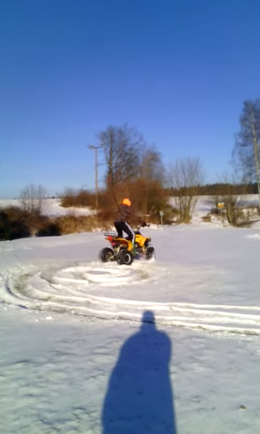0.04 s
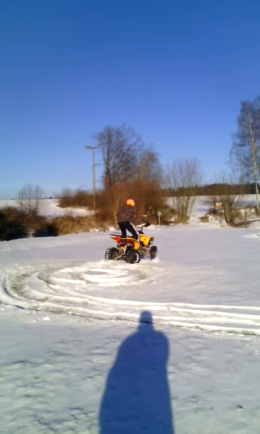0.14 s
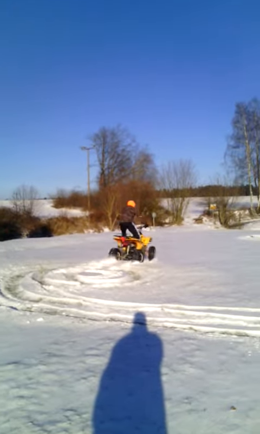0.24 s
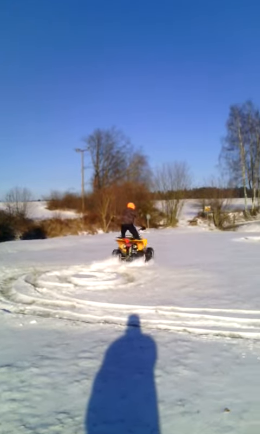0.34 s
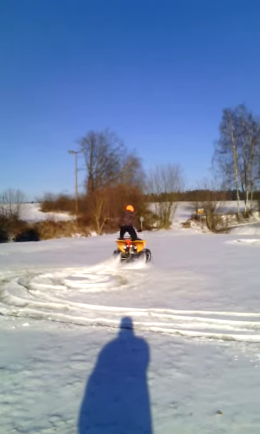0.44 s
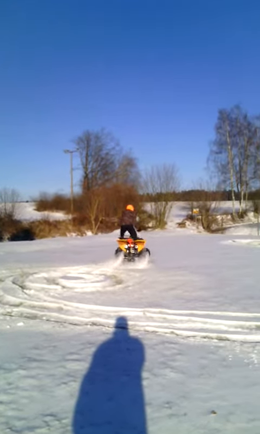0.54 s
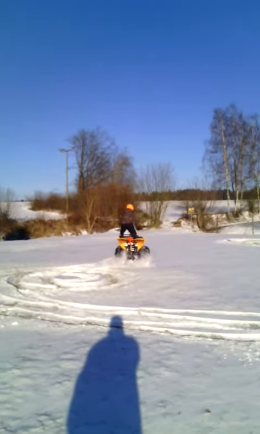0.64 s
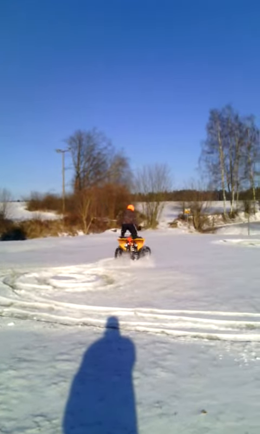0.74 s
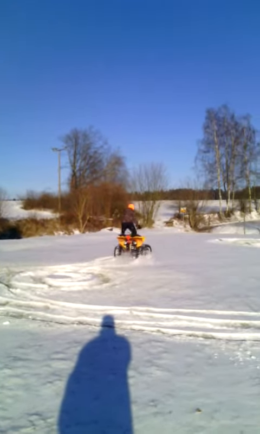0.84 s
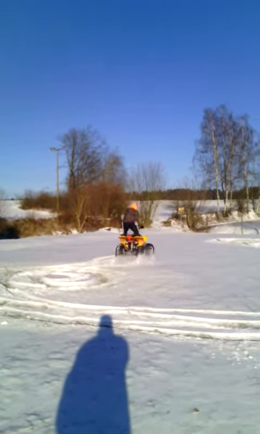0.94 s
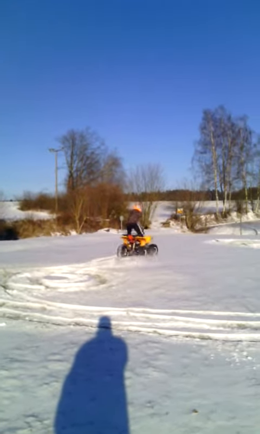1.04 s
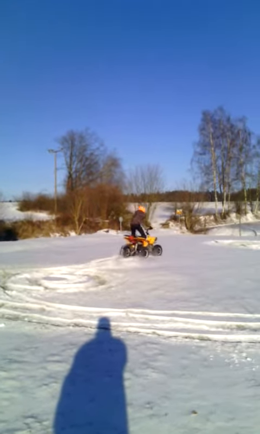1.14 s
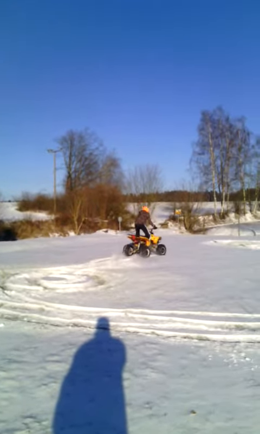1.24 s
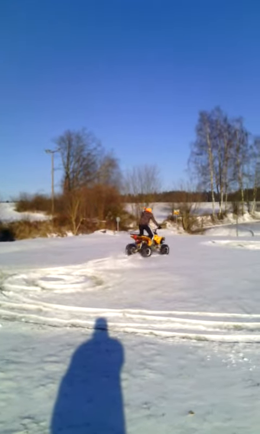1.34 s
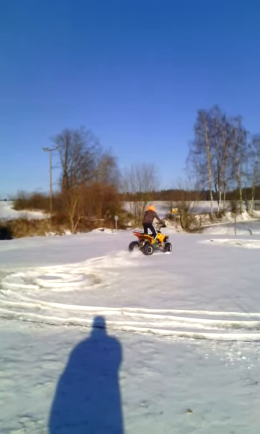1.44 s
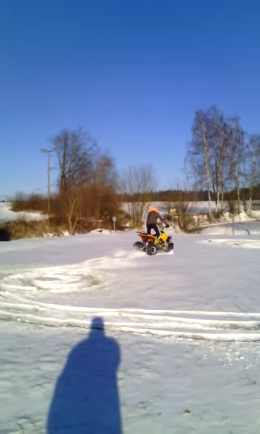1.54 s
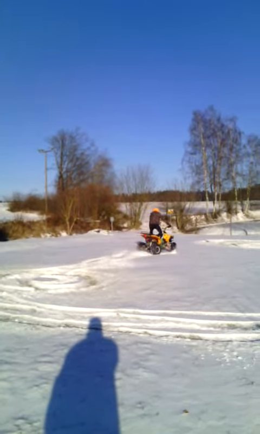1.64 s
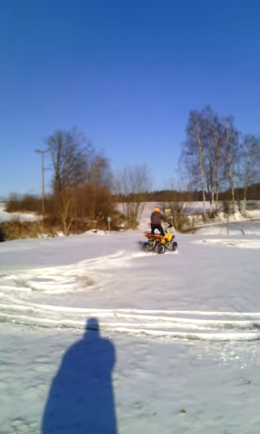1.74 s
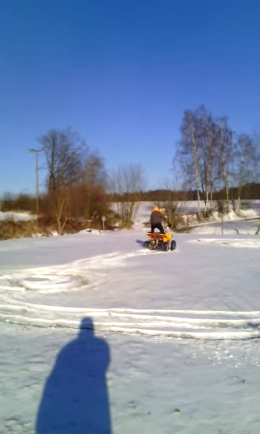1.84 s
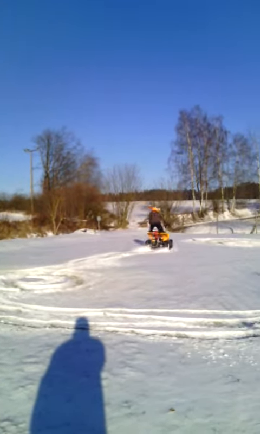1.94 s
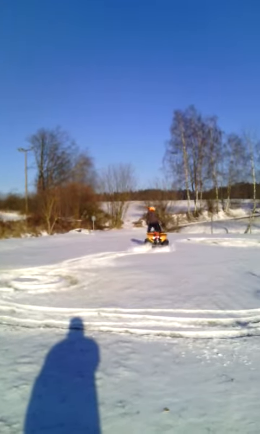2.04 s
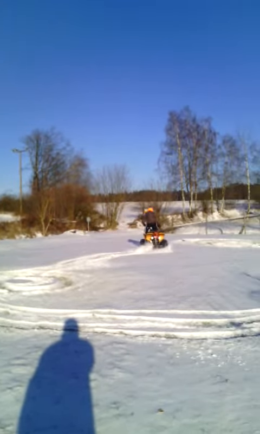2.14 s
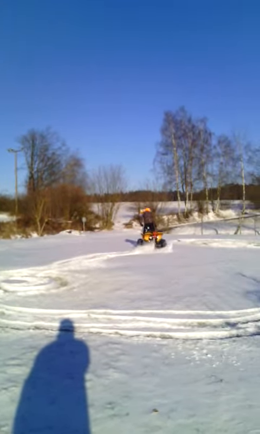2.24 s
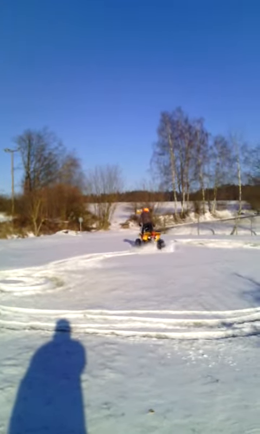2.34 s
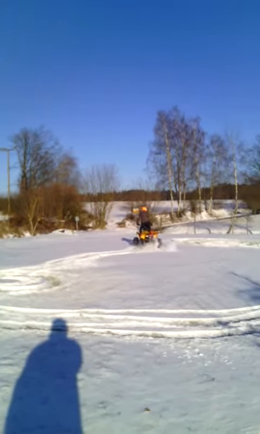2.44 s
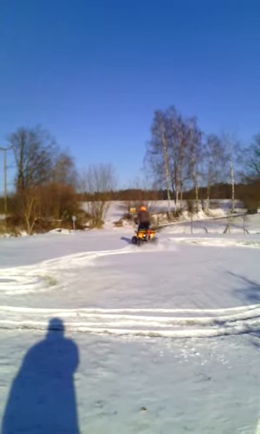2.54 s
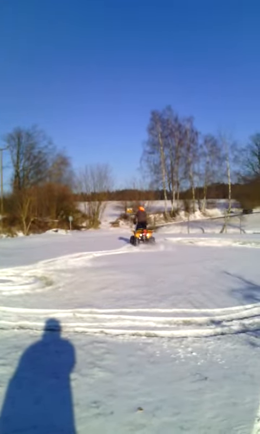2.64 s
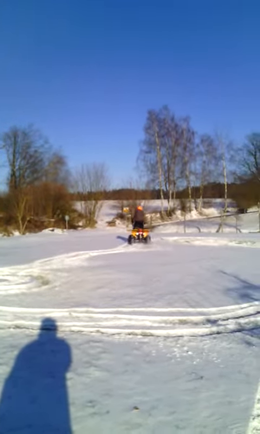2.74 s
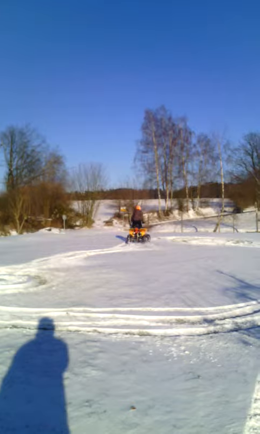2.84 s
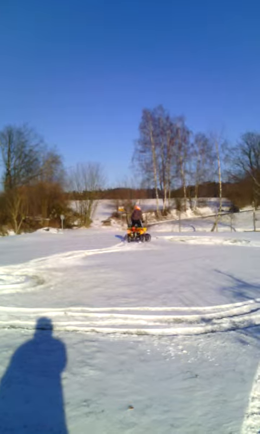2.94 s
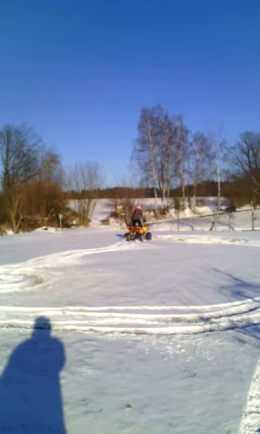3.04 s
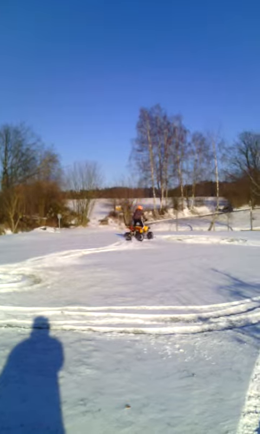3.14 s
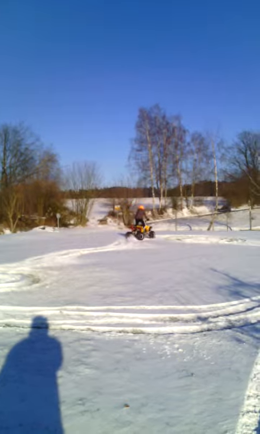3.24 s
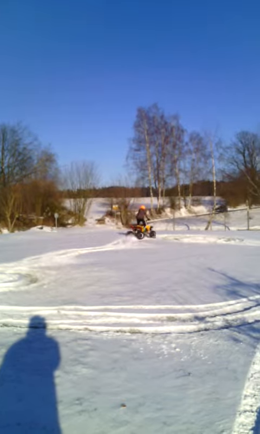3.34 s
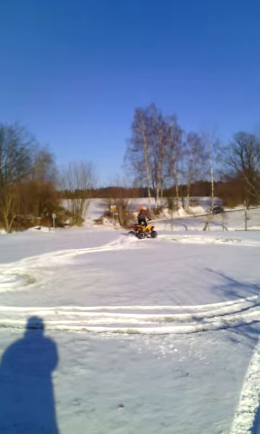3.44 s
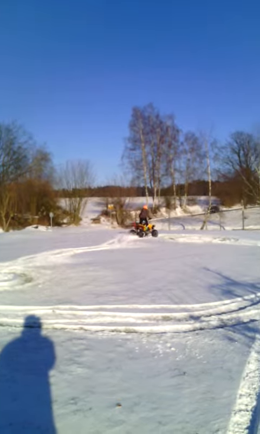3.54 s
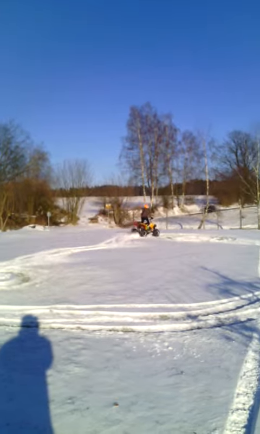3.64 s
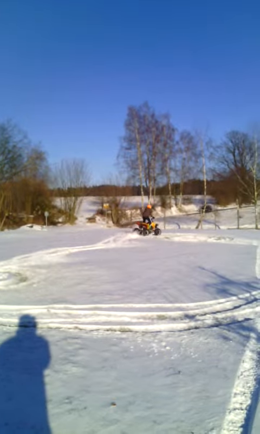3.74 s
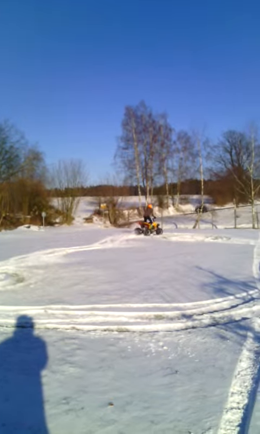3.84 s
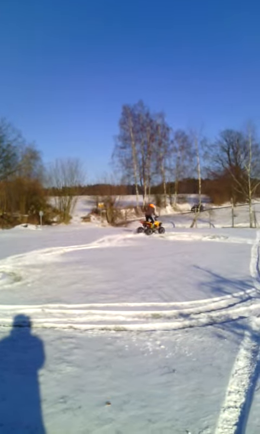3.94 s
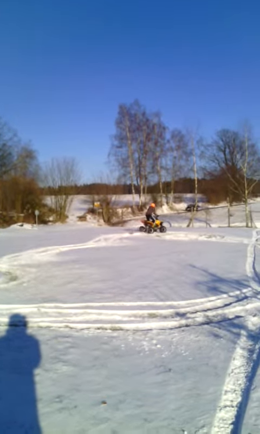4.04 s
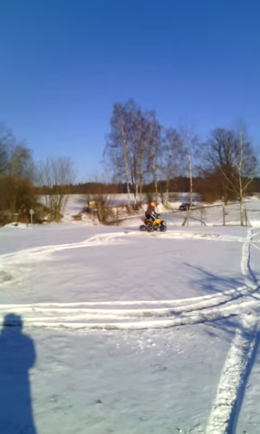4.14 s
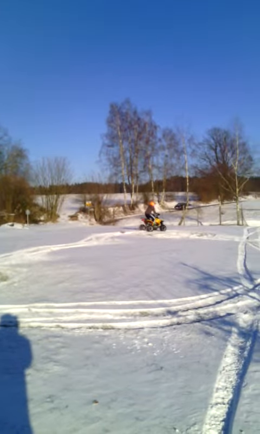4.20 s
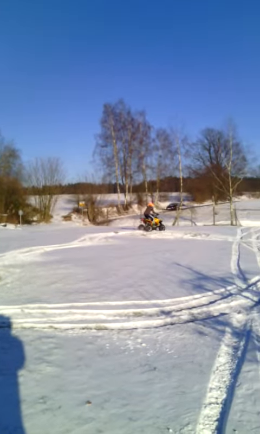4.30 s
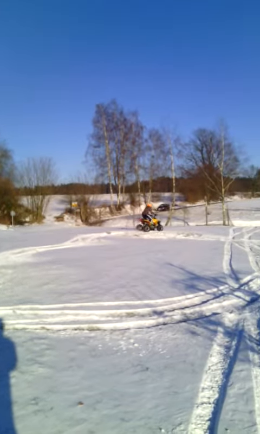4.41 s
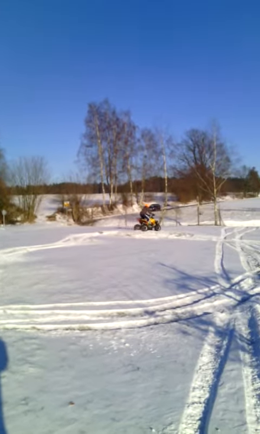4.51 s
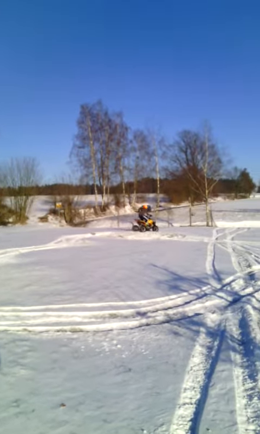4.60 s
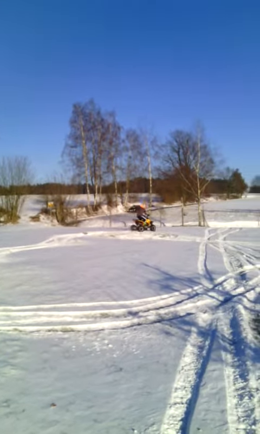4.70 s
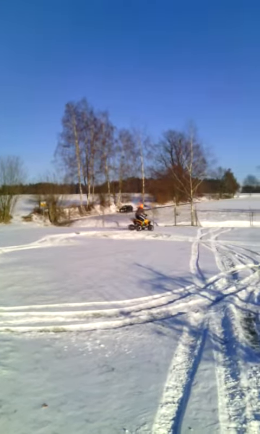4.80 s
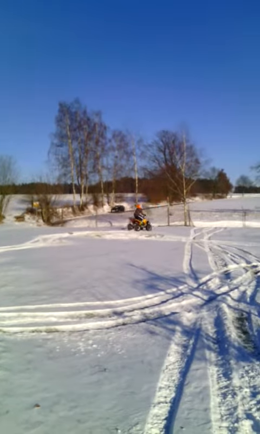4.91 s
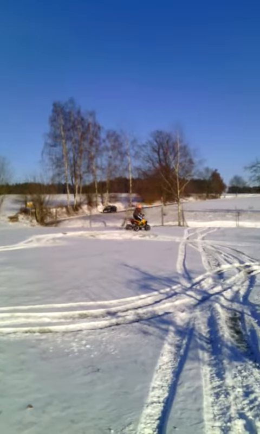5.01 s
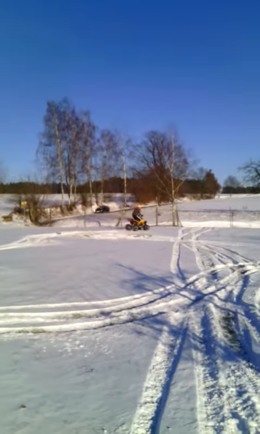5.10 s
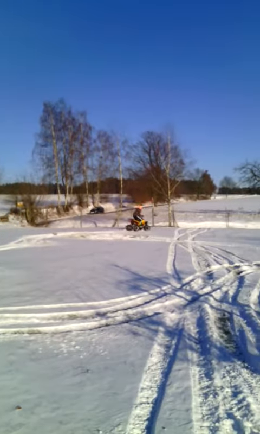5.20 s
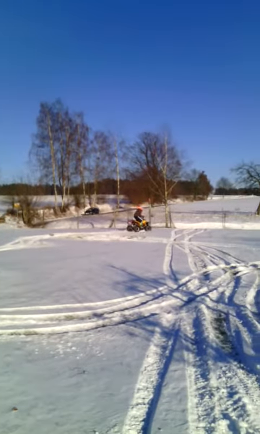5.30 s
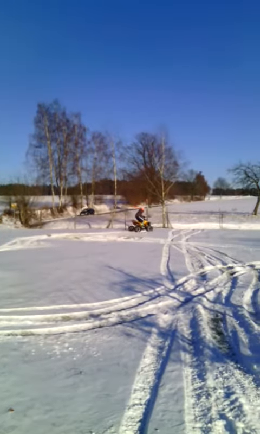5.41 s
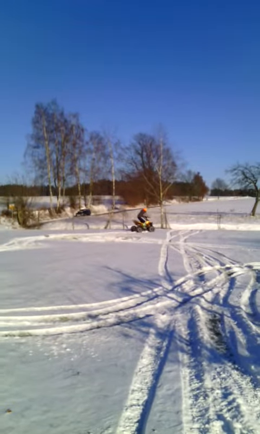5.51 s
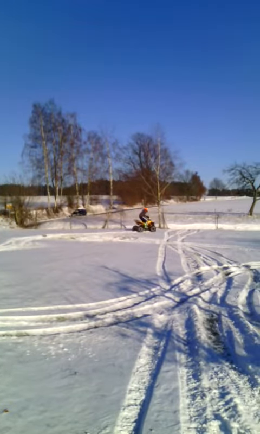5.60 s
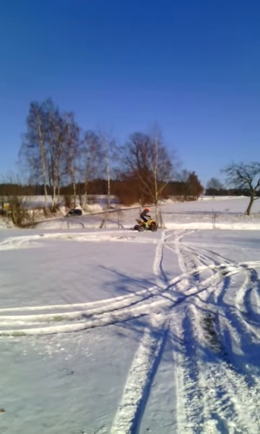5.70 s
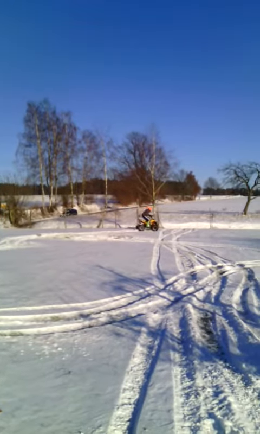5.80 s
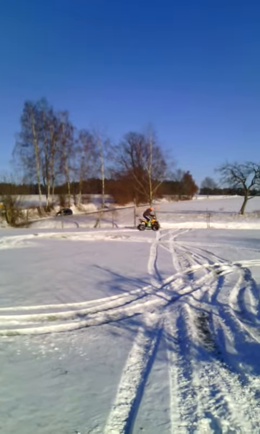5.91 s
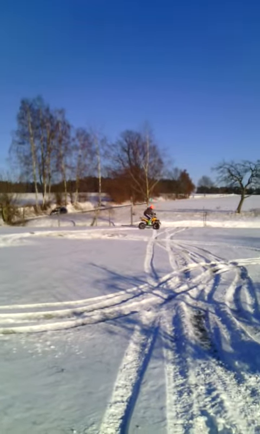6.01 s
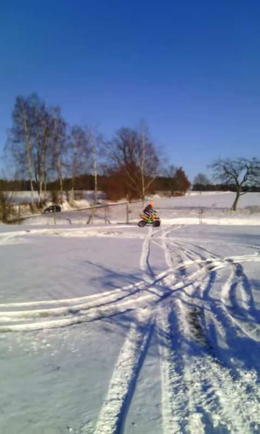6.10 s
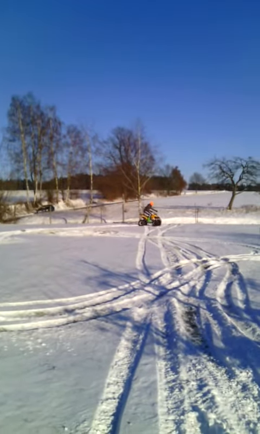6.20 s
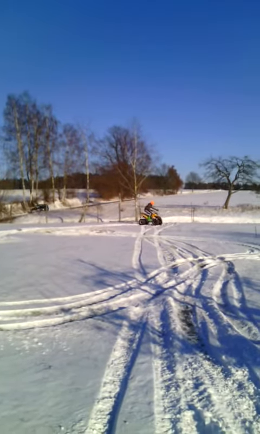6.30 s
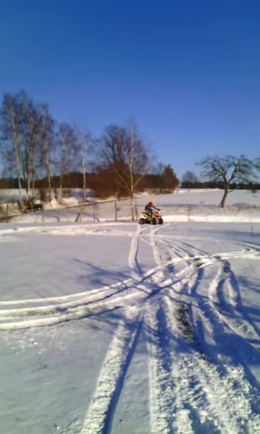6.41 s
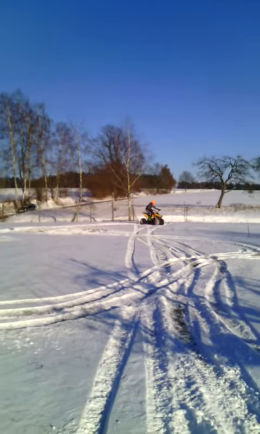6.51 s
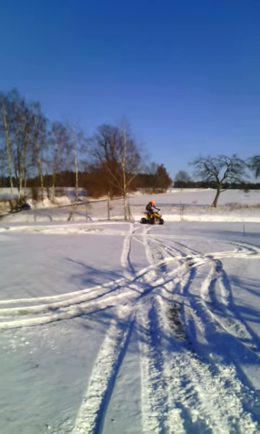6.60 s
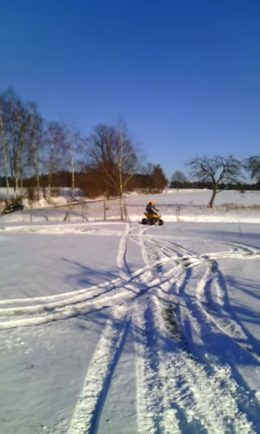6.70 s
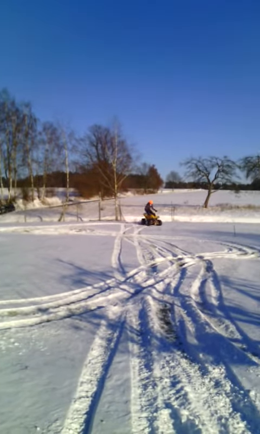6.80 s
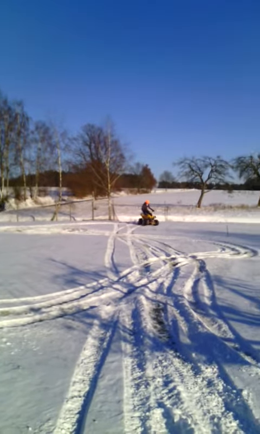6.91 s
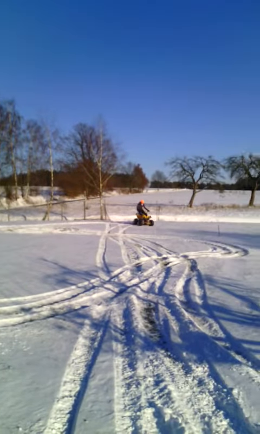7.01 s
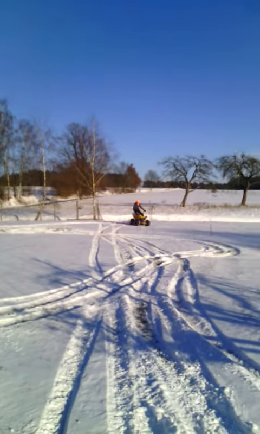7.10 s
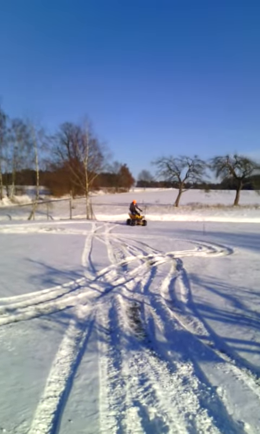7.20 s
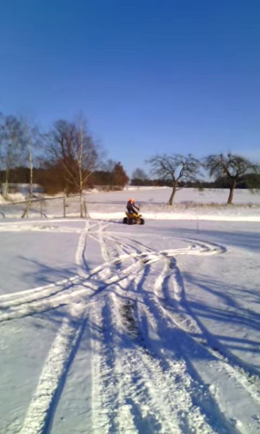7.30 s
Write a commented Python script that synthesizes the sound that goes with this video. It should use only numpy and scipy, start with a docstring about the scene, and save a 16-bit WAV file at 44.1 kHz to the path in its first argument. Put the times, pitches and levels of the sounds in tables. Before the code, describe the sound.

Raspy four-stroke quad engine pulls hard into the distance, tyres churning snow, shuts down to separate thuds, then revs moderately again.

```python
"""Quad bike leaving over snow

From an open snowy field: a single-cylinder four-stroke quad bike pulls away, drops to a putter and picks up.
Each firing booms in the silencer, cracks in the pipe and lets out a puff of gas that rasps and hisses.
The exhaust is built from pulses, harmonics and noise locked to the engine cycle; distance and aim set its level.
Wheels churn and squeak in the snow, the frame rattles, and small ticks sound close to the microphone."""
import sys
import numpy as np
from scipy import signal
from scipy.io import wavfile
from scipy.ndimage import uniform_filter1d

SR = 44100
rng = np.random.default_rng(int(sys.argv[2]) if len(sys.argv) > 2 else 0)


def store_pcm(level_fs):
    """Save levels as 16-bit WAV."""
    pcm = np.round(np.clip(level_fs, -1, 1) * 32767).astype(np.int16)
    wavfile.write(sys.argv[1], SR, np.atleast_2d(pcm).T)


N = 324135
TIME = np.arange(N) / SR
TAPS = 8192  # filter design length, samples
HZ = np.fft.rfftfreq(TAPS, 1 / SR)

# Still air over the field: pitch_hz, level_db (relative, per Hz)
AIR_COLOUR = [(20, -10), (50, -17), (120, -20), (250, -15), (400, -14), (700, -9), (1400, -8), (1680, -14),
              (1950, -6), (3000, -11), (4500, -15), (9000, -15), (15500, -18)]
AIR_DB = -58

# Wheels in the snow: start_s, level_db (RMS)
CHURN_LEVEL = [(0, -41), (3, -48.5), (4.5, -53.5), (5.4, -60), (6.4, -59), (6.8, -52.5), (7.15, -53.5),
               (7.35, -51)]
# Colour of the breaking snow: pitch_hz, level_db (relative, per Hz)
SNOW_COLOUR = [(60, -8), (350, -6), (700, 4.5), (1200, 2), (1720, 1), (2300, -7.5), (4000, -7.5),
               (5000, -21.5), (15000, -35)]
# Snow squeaking under the tyres: start_s, length_s, start_hz, end_hz, width_hz, level_db (RMS before the fades)
SQUEAKS = [(5.231, 0.029, 2320, 2580, 100, -41.5), (5.673, 0.11, 2880, 2900, 400, -54),
           (5.79, 0.081, 2770, 3000, 300, -52.5), (7.185, 0.11, 1600, 1690, 500, -45),
           (7.264, .13, 1644, 1884, 300, -43), (7.19, 0.19, 3720, 3880, 1000, -56.5)]
# Frame rattles: start_s, level_db (at the strike, relative)
RATTLES = [(1.975, -7), (2.862, -10), (3.8357, -7.5), (4.675, -30), (4.77, -32), (5.081, -20), (5.089, -20),
           (5.286, -22), (5.923, -21)]
# Ticks by the microphone: start_s, level_db, pitch_hz, decay_per_s
TICKS = [(1.2660, -10, 11500, 6000), (6.954, -30, 9000, 5000), (6.978, -26.5, 7450, 1500)]
# Heavy thumps as the throttle shuts: centre_s, level_db (peak), pitch_hz
STUMBLES = [(4.626, -39, 150), (4.653, -34, 154), (4.682, -39.5, 145), (4.741, -39, 146)]

# Engine speed: start_s, firings_per_s
FIRING_RATE = [(0.0, 36.59), (0.62, 41.95), (1.1, 44.94), (1.51, 43.62), (2.36, 45.18), (2.89, 42.14),
               (3.71, 43.58), (3.95, 44.83), (4.2, 41.81), (4.35, 42.96), (4.55, 39.39), (4.72, 31.2),
               (5.01, 28.06), (5.19, 28.29), (5.45, 21.12), (5.69, 24.56), (6.02, 27.07), (6.17, 30.09),
               (7.11, 36.66), (7.35, 36.33)]
# The rider holds the throttle wide, shuts it, then opens it about halfway: start_s, throttle (0-1)
THROTTLE = [(0, 0.72), (.45, 1), (1, 0.96), (4.52, 0.94), (4.59, 0.49), (4.73, 0.45), (4.85, .12),
            (5.55, 0.03), (5.93, 0.47), (7.35, 0.4)]
# Where the bike is, swinging as it goes: start_s, distance_m, tail facing the microphone (0-1)
PATH = [(0, 7.7, 0.15), (.28, 10.5, 0.4), (.58, 10.6, 1), (1.2, 14.1, 0.33), (1.85, 14.4, 0.03),
        (2.3, 18.5, 0.64), (2.88, 18.4, 0.83), (3.15, 22, 0.16), (3.7, 24.2, 0), (4.5, 31.2, 0.14),
        (5.5, 35, 0.4), (7.35, 24.5, 0.08)]
NEAR_M = 10  # reference distance of the exhaust levels, m

# Gas flow through one engine cycle: share of the cycle (0-1), level_db (before the depth of each puff scales it)
GAS_FLOW = [(0, -36), (.06, -1), (.115, 7.5), (.18, 3.5), (.29, -3), (.42, -5), (.66, -1.5), (.82, -8.5),
            (1, -3.5)]
FULL_FORCE = 0.88  # force of the gas pulse at full throttle (0-1)
LOAD_FROM, LOAD_SPAN = 0.674, 0.402  # throttle where the engine starts to pull; further share to full pull

# Levels of the exhaust parts, one row each: level_db (at NEAR_M, full throttle, side-on),
# loss_db with the throttle shut, loss_db per doubling of distance, gain_db tail-on
THRUM_LEVEL = (-42, -9, 4.5, -0.5)
BOOM_LEVEL = (-39, 1, 6.5, 4)
BARK_LEVEL = (-34, 14.5, 7.5, 0)
RASP_LEVEL = (-32, 19, 3.5, 2)
HISS_LEVEL = (-41, 12, 6.5, -1)
# Shares within the rasp, relative, same columns: rap of the valve opening, ring of the returning waves
RAP_LEVEL = (2, 21, 0.7, -3)
RING_LEVEL = (-13.5, 15, .2, 13.5)
# Knock when pulling at low revs: below_firings_per_s, rap_db per firing/s less (at full throttle)
LUG = (35.1, 2.1)

# Silencer note, relative levels: multiple of the firing rate, load_db, coast_db (before the muffling)
ORDERS = [(1, -50, -38), (2, -45, -4.5), (3, -9, -4), (4, -7, 0), (5, 6.5, 4), (6, -8.5, 8), (7, -44, 3),
          (8, -23, 2.5), (9, -16.5, 2), (10, -23, 3.5), (11, -11.5, -4), (12, -15, -0.5)]
# The silencer swallows the top of the soft coasting pulses: pitch_hz, gain_db
MUFFLE = [(20, -35), (60, -3.5), (120, -0.5), (190, 5.5), (220, -4.5), (245, -18), (290, -16), (335, -11.5),
          (400, -31)]
# Resonance of the silencer box: pitch_hz, width_hz (centre to half gain_db), gain_db (at full load)
BOX = (193, 16, 3.7)
MAIN_ORDER = 5  # multiple of the firing rate that excites the box
# Gas rumbling through the silencer: pitch_hz, level_db (relative, per Hz)
RUMBLE_COLOUR = [(25, -32), (55, -19), (85, -9), (130, -7), (190, 8.5), (240, -1.5), (330, -12), (500, -27),
                 (1500, -60)]

# Exhaust resonances, relative levels; the spread is narrowed a little in resonances().
# Low ones of the pipe: pitch_hz, spread_hz, level_db
PIPE_MODES = [(500, 42, -2), (654, 54, 3), (815, 55, -0.5), (1062, 91, -3), (1266, 107, 0), (1453, 152, 1),
              (950, 900, -18)]
# Those of the tailpipe: pitch_hz, spread_hz, level_db
TAILPIPE_MODES = [(1870, 65, 2.5), (1974, 87, 0.5), (2496, 92, -11), (2494, 340, -5.5), (2760, 490, -17),
                  (3237, 210, -11), (3844, 60, -14.5), (3990, 40, -12)]
# Those of the outlet: pitch_hz, spread_hz, level_db
OUTLET_MODES = [(4300, 530, -4.5), (5015, 115, -2), (5630, 370, 1), (6260, 270, 0.5), (7000, 220, -1),
                (7610, 215, 3), (8420, 220, 2), (9140, 240, 2.5), (9880, 290, 0.5), (10550, 350, -0.5),
                (11380, 310, -1.5), (12020, 560, -2.5), (11700, 340, -7.5), (12700, 440, 2),
                (14050, 350, -0.5), (14900, 1600, -9.5)]
TURBULENCE_DB = -3.5  # turbulence in the pipe beside the crack
# The hiss is duller tail-on than side-on: pivot_hz, loss_db per octave tail-on, facing where it is level (0-1)
BEAM = (6900, 4.5, 0.38)

EDGE_HZ = 15750  # upper limit of the recorder


def amp(db):
    """Decibels to gain."""
    return 10 ** (np.asarray(db) / 20)


def curve(rows):
    """The columns of a time table, one value per sample."""
    s, *columns = np.transpose(rows)
    return [np.interp(TIME, s, column) for column in columns]


def spectrum(points):
    """Gain over frequency from a few points, joined on a log-frequency scale."""
    hz, db = np.transpose(points)
    return amp(np.interp(np.log(HZ + 1), np.log(hz), db))


def resonances(modes):
    """Gain over frequency of steep-sided resonances, summed in power."""
    power = 0
    for hz, spread_hz, db in modes:
        detuning = (HZ - hz) / (0.95 * spread_hz)
        power = power + amp(db) ** 2 / (1 + detuning ** 2) ** 2
    return np.sqrt(power)


def ring(x, gain):
    """Passes x through a causal minimum-phase filter, so that every pulse rings after its blow."""
    log_gain = np.log(np.maximum(gain, 1e-5))
    both_sides = np.r_[log_gain, log_gain[-2:0:-1]]
    minimum_phase = np.exp(np.conj(signal.hilbert(both_sides)))
    response = np.fft.ifft(minimum_phase).real
    return signal.oaconvolve(x, response[:TAPS // 2])[:N]


def steady(x, size=6000):
    """Holds the power near 1 over several cycles (size in samples), leaving the pulses intact."""
    power = uniform_filter1d(uniform_filter1d(x ** 2, size), size)
    return x / np.sqrt(abs(power) + 1e-20)


def noise():
    """White noise."""
    return rng.standard_normal(N)


def drift(per_s):
    """Slow random wander between points of unit spread, one value per sample."""
    knots = np.arange(0, TIME[-1] + 1, 1 / per_s)
    return np.interp(TIME, knots, rng.standard_normal(len(knots)))


def add(mix, s, sound):
    """Lays a sound into the mix at time s."""
    part = mix[max(round(s * SR), 0):][:len(sound)]
    part += sound[:len(part)]


def air():
    """Faint even background of the open field: coloured noise."""
    return amp(AIR_DB) * steady(ring(noise(), spectrum(AIR_COLOUR)))


def wheels():
    """Tyres break the snow crust in many small grains, and squeak where they slip."""
    grains = noise() * amp(2.2 * noise())
    out = amp(curve(CHURN_LEVEL)[0]) * steady(ring(grains, spectrum(SNOW_COLOUR)))
    for s, length, start_hz, end_hz, width_hz, db in SQUEAKS:
        hz = np.linspace(start_hz, end_hz, int(length * SR))
        # narrow noise around zero pitch, then shifted up to the gliding squeak
        low_pass = signal.butter(2, width_hz / SR)
        slip = signal.lfilter(*low_pass, noise() + 1j * noise())[-len(hz):]
        glide = np.exp(2j * np.pi * np.cumsum(hz) / SR)
        squeak = (slip * glide).real
        fade = signal.windows.tukey(len(hz), 0.7)
        add(out, s, amp(db) * fade * squeak / squeak.std())
    return out


def frame(rattle_db=-5, t60=0.039):
    """Bumps shake loose metal: short noise bursts ring through the tailpipe resonances."""
    t = np.arange(SR // 20) / SR
    out = np.zeros(N)
    for s, db in RATTLES:
        decay = amp(db + rattle_db - 60 * t / t60)
        add(out, s, decay * rng.standard_normal(len(t)))
    return ring(out, resonances(TAILPIPE_MODES))


def ticks(tail_db=-24, t60=0.011):
    """Tiny hard ticks next to the microphone: a fast-dying tone, each with a short fizz."""
    t = np.arange(SR // 50) / SR
    out = np.zeros(N)
    for s, db, hz, decay_per_s in TICKS:
        tick = np.cos(2 * np.pi * hz * t) * np.exp(-decay_per_s * t)
        fizz = np.diff(rng.standard_normal(len(t) + 1)) * amp(tail_db - 60 * t / t60)
        add(out, s, amp(db) * (tick + fizz))
    return out


def stumbles(length=0.007):
    """Unburnt fuel burns in a few heavy, dull thumps: low tones under a bell-shaped swell (length in s)."""
    out = 0
    for s, db, hz in STUMBLES:
        swell = np.exp(-((TIME - s) / length) ** 2)
        out = out - amp(db) * swell * np.cos(2 * np.pi * hz * (TIME - s))
    return out


def pulses(turns, lag, jitter, uneven_db):
    """One click per engine cycle, lag of a cycle late, uneven in time (jitter in s) and strength."""
    cycle = np.arange(int(turns[-1]) + 1)
    late, strength = rng.standard_normal((len(cycle), 2)).T
    at = ((np.interp(cycle + lag, turns, TIME) + jitter * late) * SR).astype(int)
    inside = (at > 0) & (at < N) & (cycle + lag < turns[-1])
    out = np.zeros(N)
    out[at[inside]] = amp(uneven_db * strength[inside])
    return out


def puffs(turns, depth, uneven_db):
    """Turbulence that follows the gas flow; no two firings are equally strong."""
    flow_db = np.interp(turns % 1, *np.transpose(GAS_FLOW))
    strength = rng.standard_normal(size=1000)[turns.astype(int)]
    # the unevenness shows most where the flow is strong
    return noise() * amp(depth * flow_db + uneven_db * strength * amp(flow_db))


def level_db(part):
    """A part's level follows the throttle, the distance and the way the exhaust points."""
    near_db, shut_db, doubling_db, tail_db = part
    throttle, = curve(THROTTLE)
    distance, facing = curve(PATH)
    distance_db = doubling_db * np.log2(distance / NEAR_M)
    return near_db - shut_db * (1 - throttle) - distance_db + tail_db * facing


def outlet(turns, force):
    """Each puff hisses through the outlet resonances; the colour shifts as the outlet swings about."""
    pivot_hz, tilt_db, level_facing = BEAM
    facing = curve(PATH)[1]
    out = 0
    for modes in np.array_split(OUTLET_MODES, len(OUTLET_MODES) // 3):
        octaves = np.log2(modes[:, 0].mean() / pivot_hz)
        beam_db = -tilt_db * (facing - level_facing) * octaves
        gas = puffs(turns + 0.02, depth=0.55 + 0.5 * force, uneven_db=1.5)
        gas = gas * amp(1.2 * drift(per_s=3))
        out += ring(gas * amp(beam_db), resonances(modes))
    return steady(out)


def tailpipe(turns, force, rap_db, ring_db):
    """The valve opens with a rap, gas rushes out, and returning waves ring the pipe twice more."""
    snap = pulses(turns, lag=0.082, jitter=0.00015, uneven_db=2)
    rush = steady(puffs(turns + 0.02, depth=0.45 + 0.15 * force, uneven_db=1))
    returns = sum(pulses(turns, lag=lag, jitter=0.00028, uneven_db=2) for lag in (0.38, 0.68))
    rap_modes = [(2025, 91, 4), (2337, 237, -2.5), (3250, 430, -41)]
    rap = steady(ring(snap, resonances(rap_modes)))
    # bright at light throttle
    clink = amp(-4.5) * (1 - force) ** 2 * steady(ring(snap, resonances([(3810, 86, 0)])))
    after = steady(ring(returns, resonances([(1964, 160, 0)])))
    gas = steady(ring(rush, resonances(TAILPIPE_MODES)))
    return steady(gas + amp(rap_db) * (rap + clink) + amp(ring_db) * after)


def pipe(turns, force):
    """The pressure wave steepens into a double crack, much alike from firing to firing, with turbulence."""
    first, second = (pulses(turns, lag=lag, jitter=0.00004, uneven_db=1.3) for lag in (0.18, 0.355))
    crack = -force * steady(0.55 * first + second)
    turbulence = amp(TURBULENCE_DB) * steady(puffs(turns, depth=0.044, uneven_db=1.7))
    coarse = spectrum([(450, -11.5), (850, -6.5), (1200, 3), (1600, 4)])
    modes = resonances(PIPE_MODES)
    return steady(ring(crack, modes) + ring(turbulence, modes * coarse))


def silencer(turns, load, waver_db=1.7, uneven_db=0.78, rumble_db=-19):
    """Separate thuds when coasting merge into a wavering drone under load, over a rumble of gas."""
    rate, = curve(FIRING_RATE)
    phase = 2 * np.pi * (turns - 0.25 - 0.04 * load)
    note = 0
    for k, load_db, coast_db in ORDERS:
        muffle_db = np.interp(k * rate, *np.transpose(MUFFLE))
        strength = load * amp(load_db) + (1 - load) * amp(coast_db + muffle_db)
        note -= strength * amp(waver_db * drift(per_s=14)) * np.cos(k * phase)
    # the box booms when the main order passes through its pitch
    box_hz, width_hz, box_db = BOX
    detuning = (MAIN_ORDER * rate - box_hz) / width_hz
    resonance = amp(box_db * load / (1 + detuning ** 2))
    rumble = amp(rumble_db) * steady(ring(noise(), spectrum(RUMBLE_COLOUR)))
    return resonance * steady(note) * amp(uneven_db * drift(per_s=30)) + rumble


def crank(turns, load):
    """A low wavering hum under load, one swing per turn of the crank, two per engine cycle."""
    hum = np.sqrt(2) * np.sin(2 * np.pi * 2 * turns)
    return load * amp(0.71 * drift(per_s=39)) * hum


def engine():
    """One firing every second turn of the crank drives all parts of the exhaust."""
    rate, = curve(FIRING_RATE)
    turns = np.cumsum(rate) / SR + 0.128  # engine cycles, one firing each
    throttle = np.clip(curve(THROTTLE)[0], 0, 1)
    load = np.clip((throttle - LOAD_FROM) / LOAD_SPAN, 0, 1)
    force = FULL_FORCE * throttle ** 2
    lug_below, lug_slope_db = LUG
    lug_db = throttle * lug_slope_db * np.maximum(lug_below - rate, 0)
    rap_db = level_db(RAP_LEVEL) + lug_db

    thrum = amp(level_db(THRUM_LEVEL)) * crank(turns, load)
    boom = amp(level_db(BOOM_LEVEL)) * silencer(turns, load)
    bark = amp(level_db(BARK_LEVEL)) * pipe(turns, force)
    rasp = amp(level_db(RASP_LEVEL)) * tailpipe(turns, force, rap_db, level_db(RING_LEVEL))
    hiss = amp(level_db(HISS_LEVEL)) * outlet(turns, force)
    return thrum + boom + bark + rasp + hiss


def scene():
    """Snow swallows the reflections, so all is dry; one channel."""
    mix = air() + wheels() + frame() + ticks() + stumbles() + engine()
    return mix[None]


def record(dry):
    """The recorder's band limit: a steep low-pass."""
    low_pass = signal.firwin(511, EDGE_HZ, window=("kaiser", 9), fs=SR)
    return signal.oaconvolve(dry, low_pass[None], "same")


dry = scene()
out = record(dry)
store_pcm(out)
```